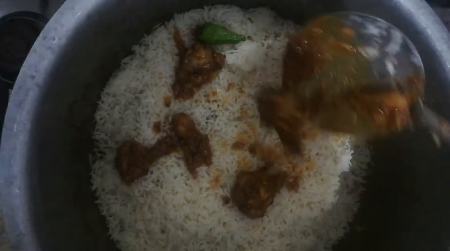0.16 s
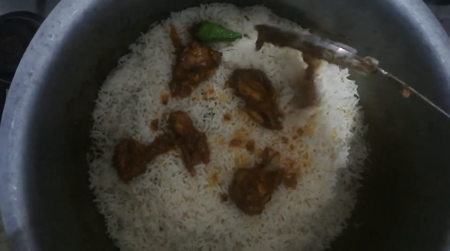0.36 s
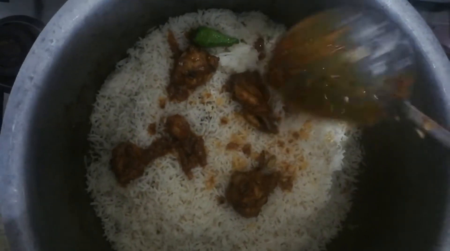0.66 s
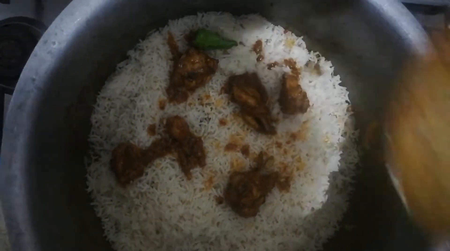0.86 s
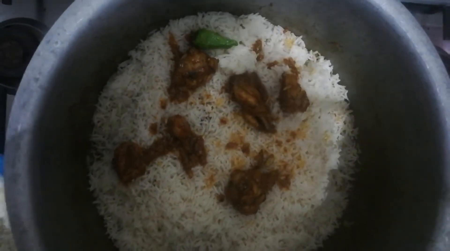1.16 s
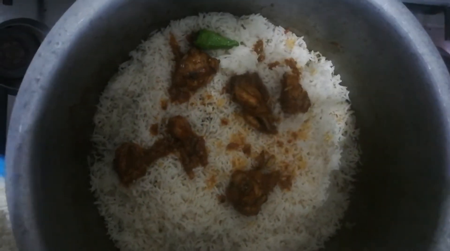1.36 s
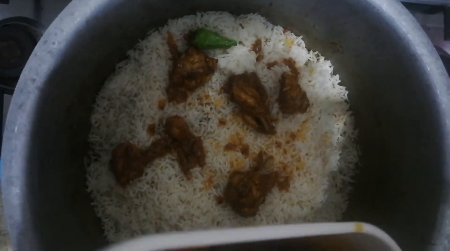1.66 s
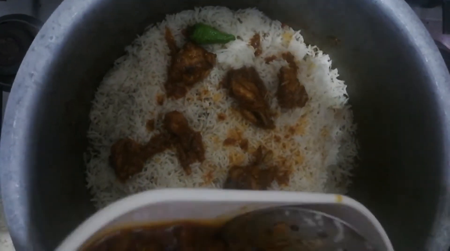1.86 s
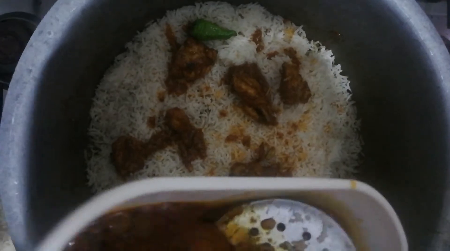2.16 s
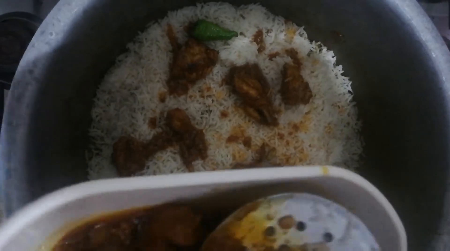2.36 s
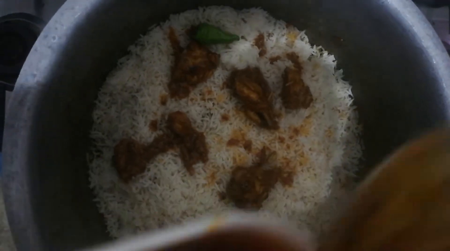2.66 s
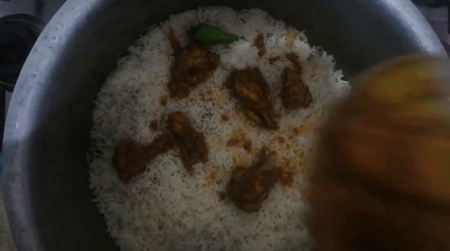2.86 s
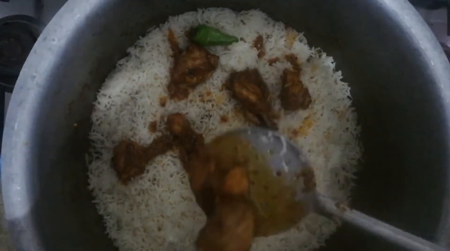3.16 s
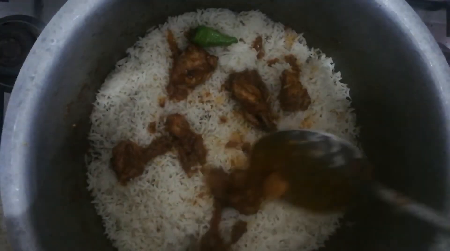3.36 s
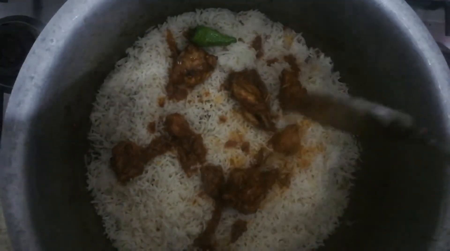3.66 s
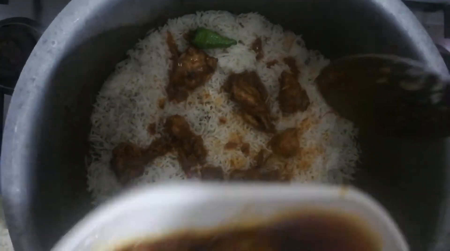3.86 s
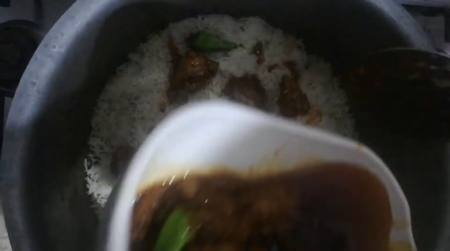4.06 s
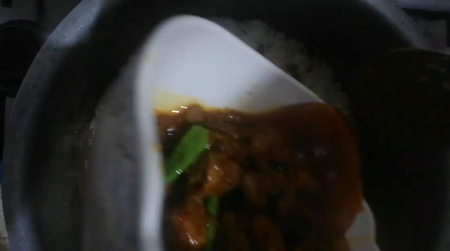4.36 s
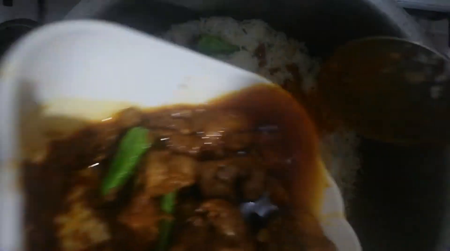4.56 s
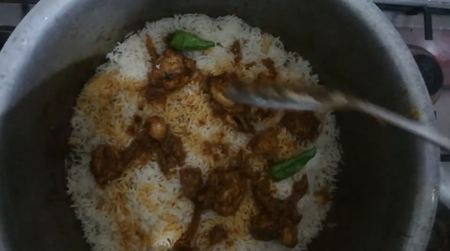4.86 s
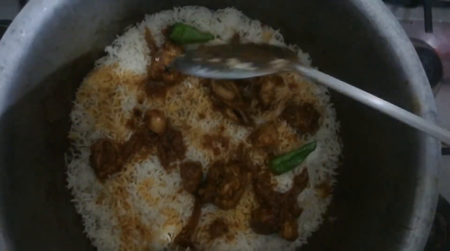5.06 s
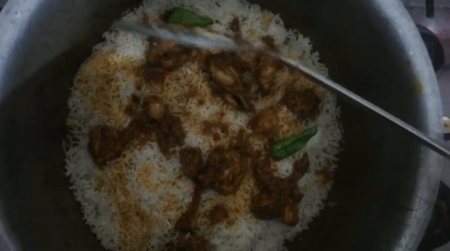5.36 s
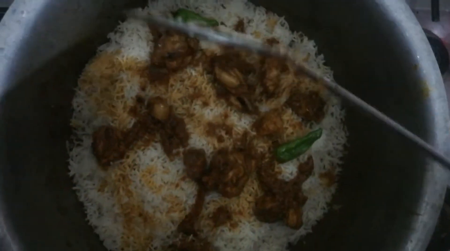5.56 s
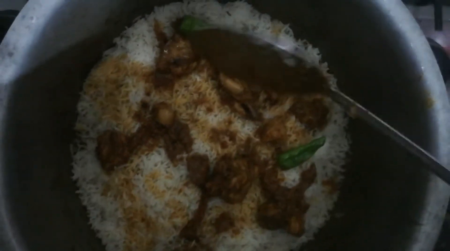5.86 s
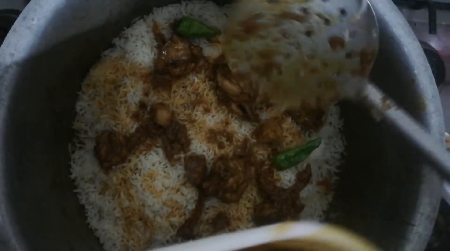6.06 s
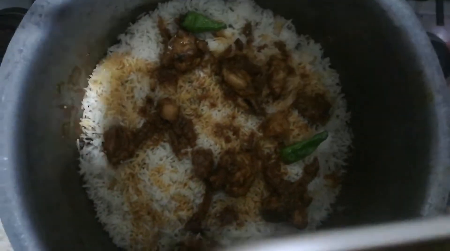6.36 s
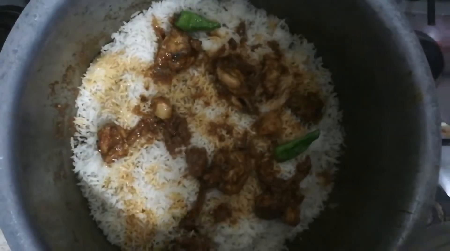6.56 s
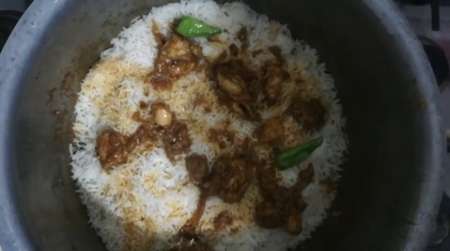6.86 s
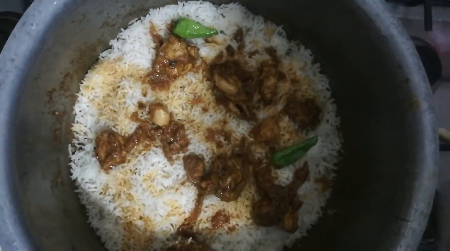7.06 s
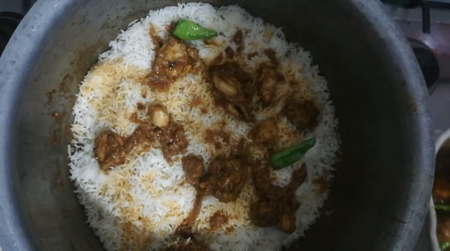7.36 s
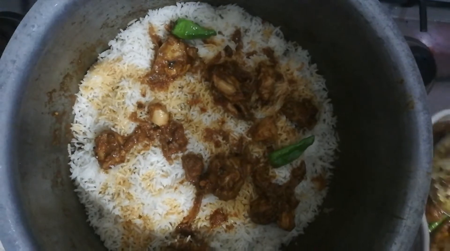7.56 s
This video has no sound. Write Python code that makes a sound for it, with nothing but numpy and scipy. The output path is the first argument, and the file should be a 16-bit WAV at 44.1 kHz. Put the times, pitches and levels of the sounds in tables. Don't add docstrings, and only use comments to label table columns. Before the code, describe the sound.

In a small tiled kitchen, low hum and soft frying hiss continue with tiny fat spits and a muffled bump against the microphone. A steel spoon cracks against a plastic sauce bowl several times, and the bowl thuds on a metal pot that rings. Sauce squelches briefly, later pours with fine bubbling froth, then the sound cuts suddenly to a wavering gas burner rumble over even hiss.

```python
import sys
import numpy as np
from scipy import signal
from scipy.fft import rfft, irfft
from scipy.io import wavfile
from scipy.ndimage import uniform_filter1d

SR = 44100
rng = np.random.default_rng(int(sys.argv[2]) if len(sys.argv) > 2 else 0)


def transcribe(u):
    v = np.clip(np.atleast_2d(u).T, -1, 1)
    q = np.round(v * 32767).astype(np.int16)
    wavfile.write(sys.argv[1], SR, q)


def convert_level_to_amplitude(level_db):
    exponent = np.asarray(level_db, float) / 20
    return 10 ** exponent


N = 340493
T = np.arange(N) / SR


def unit(x):
    return x / np.sqrt(np.mean(x ** 2))


def band(x, lo_hz, hi_hz):
    sos = signal.butter(2, [lo_hz, min(hi_hz, .45 * SR)], "band", fs=SR, output="sos")
    return signal.sosfilt(sos, x)


def add(out, s, x):
    i = int(s * SR)
    out[i:i + len(x)] += x[:N - i]


def walk(rate):
    k = int(SR / rate)
    held = np.repeat(rng.standard_normal(N // k + 1), k)
    return 2.04 * uniform_filter1d(uniform_filter1d(held, k), k)[:N]


def tinted(x, spectrum):
    hz, db = np.transpose(spectrum)
    f = np.fft.rfftfreq(len(x), 1 / SR) + 1
    gain = convert_level_to_amplitude(np.interp(np.log(f), np.log(hz), db, left=-150, right=-150))
    return rfft(x) * gain, f


def coloured(spectrum, flicker_db, grain_db, centres):
    size = convert_level_to_amplitude(grain_db * np.minimum(rng.exponential(size=N), 2.2))
    starts = (rng.random(N) < .001) * size
    puffs = signal.fftconvolve(starts, np.exp(-T[:SR // 50] / 0.0018))[:N]
    source, f = tinted(rng.standard_normal(N) * (1 + 0.5 * puffs), spectrum)
    shares = [np.interp(np.log(f), np.log(centres), row) for row in np.eye(len(centres))[1:-1]]
    return sum(irfft(source * share, N) * convert_level_to_amplitude(flicker_db * walk(8)) for share in shares)


def background(levels, low, middle, top, hum_flicker_db, grain_db):
    hum = coloured(low, hum_flicker_db, 2.1, [10, 20, 60, 120, 240, 450, 700])
    hum *= convert_level_to_amplitude(hum_flicker_db * walk(18))
    hiss = coloured(middle, 0.76, grain_db, [450, 700, 1300, 2400, 4200, 6500, 9000])
    sizzle = coloured(top, 1.0, grain_db, [5560, 9000, 12260, 15100, 18000])
    return sum(unit(x) * convert_level_to_amplitude(db) for x, db in zip((hum, hiss, sizzle), levels))


def kitchen():
    # t/s, hiss level/dB
    frying = [
        (0, -65.5),
        (.3, -62.5),
        (1.0, -61),
        (1.5, -62.5),
        (2.7, -63),
        (3.9, -62),
        (4.89, -65.5),
    ]
    # f/Hz, level/dB
    hum_colour = [(12, -45), (20, 0.5), (38, -13), (70, -2), (178, -6.5), (213, 1), (262, -10), (700, -19)]
    hiss_colour = [(450, -5), (652, -17.5), (1430, -13), (2600, -13.5), (4700, -14.5), (5900, -20),
                   (10000, -15)]
    sizzle_colour = [(6000, -25), (7290, -3), (10500, -2.5), (13200, -8), (14800, -14), (15700, -16),
                     (16200, -29), (16500, -50)]
    swell_s, swell_width_s = 0.63, 0.16
    hum_db = -64.5 + 5 * np.exp(-((T - swell_s) / swell_width_s) ** 2)
    fry_db = np.interp(T, *np.transpose(frying))
    top_db = fry_db - 8 + 3 * np.exp(-(T / 0.99) ** 2)
    return background((hum_db, fry_db, top_db), hum_colour, hiss_colour, sizzle_colour, 0.62, 6.3)


def bubbles(rows, crack_db):
    out, t = np.zeros(N), T[:SR // 20]
    for s, db, hz, cycles, glide in rows:
        life = max(cycles, .5) / hz
        noise = rng.standard_normal(len(t))
        ragged = 1 + 0.62 * unit(uniform_filter1d(noise, size=30))
        envelope = np.exp(-(1.14 * t / life) ** 2) * np.minimum(t / life / 0.066, 1)
        tone = np.sin(2 * np.pi * hz * t * (1 + glide * t / life / 2)) * envelope
        crack = band(noise * np.exp(-t / 0.0016), hz / 1.38, min(hz * 3.3, 14500.))
        add(out, s, convert_level_to_amplitude(db) * (ragged * tone + convert_level_to_amplitude(crack_db) * crack))
    return out


def spits():
    # t/s, peak level/dB, f/Hz
    fat_spits = [(.1915, -47, 1890), (.4464, -43.5, 9000), (.62, -45, 9000), (.6654, -53, 1430),
                 (.674, -50, 2470), (.745, -52, 11000), (.7647, -44.5, 3460), (1.2101, -52, 3480),
                 (1.4232, -49, 2160), (2.4133, -54, 4500), (2.51, -49, 3630), (2.645, -61, 4500),
                 (2.9501, -52, 5000), (3.023, -52, 1440), (3.1872, -54, 2450), (3.338, -48, 1700),
                 (3.4348, -46.5, 1570), (3.5686, -49, 11000), (4.1594, -56, 2430), (5.1625, -53, 1820),
                 (5.255, -53, 2110), (5.5505, -53, 1680), (5.6497, -52.5, 1670), (6.555, -57, 1040),
                 (7.188, -53.5, 1460), (7.3594, -63, 3280)]
    least_cycles, extra_life_s = 2.5, 0.00049
    return bubbles([(s, db, hz, least_cycles + hz * extra_life_s, 0) for s, db, hz in fat_spits], -0.3)


def bumps():
    # t/s, peak level/dB, f/Hz, length/cycles
    pushes = [
        (0.205, -32, 78.3, 1.07),
        (1.223, -42, 63.4, 0.94),
        (1.244, -48, 55, 1.4),
        (1.273, -48, 61, 2.4),
        (1.4740, -44.5, 69.5, 1.2),
    ]
    out, t = np.zeros(N), T[:SR // 5]
    for s, db, hz, cycles in pushes:
        swell = np.sin(np.pi * np.minimum(t * hz / cycles, 1))
        add(out, s, convert_level_to_amplitude(db) * np.sin(2 * np.pi * hz * t) * swell)
    return out


def ring(modes, longest, split_hz):
    t = T[:SR // 2 + SR // 4]
    hz, db, t60 = np.transpose(modes)[:, :, None]
    phase, offset, detune = rng.random((3,) + hz.shape)
    main = np.sin(2 * np.pi * (hz * t + phase))
    twin = 0.53 * np.sin(2 * np.pi * ((hz + split_hz * (detune - .5)) * t + phase + offset / 2))
    twin += 0.39 * np.sin(2 * np.pi * ((hz - split_hz * offset) * t + detune)) * (hz < 1200)
    decay = convert_level_to_amplitude(db - 60 * t / np.clip(t60, .004, longest))
    return (decay * (main + twin)).sum(0)


def knocks():
    # t/s, peak level/dB, time until damped/ms, rattle level/dB, metal ring level/dB
    blows = [
        (1.5518, -11.5, 11, -5.5, -35.5),
        (1.7545, -6, 4.7, -9, -37.5),
        (2.0783, -12.5, 11, -0.5, -32.5),
        (2.0934, -25, 7.2, 8, -45),
        (2.1607, -11.5, 18, -4.5, -27),
        (2.3524, -22.5, 15, -3.5, -29),
    ]
    # f/Hz, level/dB, t60/s
    rim_a = [(589, -1.5, 0.12), (1259, 3.5, 0.11), (2308, 1, 0.085), (2570, -1, 0.048), (3090, -6.5, 0.088),
             (4840, -5, 0.12), (5350, -12, 0.2), (7200, -13, 0.13), (7960, -4.5, 0.017), (8200, -12, 0.047),
             (8600, -28, 0.04), (10560, 3, 0.026), (11000, -11, 0.055), (12700, -23, 0.024)]
    rim_b = [(588, -6, 0.11), (896, -7.5, 0.068), (1238, -7, 0.091), (1890, -5.5, 0.042),
             (2270, -18, 0.047), (2450, -12, .02), (3280, -22, 0.095), (3910, -6, 0.025), (4640, -8, 0.042),
             (7570, 2, 0.013), (9400, -11, 0.027), (9668, -42, 0.016), (10800, -8.5, 0.012),
             (12000, -9, 0.017)]
    wall = [(560, -5.5, 0.13), (1170, -22, 0.034), (2580, -20, 0.15), (3200, -8, 0.012), (3400, -4, 0.026),
            (3810, -7, 0.019), (4260, 4.5, 0.012), (4877, -15, 0.019), (6530, 1, 0.0083),
            (10100, -27, 0.034)]
    pot_thud = [(216, -3, 0.027), (340, 0.5, 0.051), (435, -5, .05), (587, 4.5, 0.033), (767, 1, 0.024),
                (997, -5, 0.06), (1133, -8, .08), (1610, -16.5, 0.056), (2290, -19, .1), (3170, -14, 0.057),
                (3330, -34, 0.034), (4310, -11, 0.055), (5000, -13, .07), (5860, -21, 0.01)]
    tap = [(840, 3.5, 0.026), (1000, -0.5, 0.064), (1700, 1, 0.011), (2040, 3, 0.01), (2600, -5, 0.02),
           (3350, -26, 0.027), (4500, 1.5, .012), (6400, -16, 0.013), (7870, -11, .012)]
    # f/Hz, level/dB, t60/s
    spoon = [(542, -3.5, 0.9), (1290, -10, 0.17), (1836, -24, .5), (2090, -21, .6), (2207, -24, 0.22),
             (2500, -22, .6), (3705, -18, 0.17), (4580, -10, 0.13), (4930, -8, .7), (6300, -24, .4),
             (7790, -25, .7)]
    spoon_dipped = [(339, -13, 0.92), (553, -3, 1), (944, -15, 0.95), (1130, -22, 0.45), (1227, -28, 0.4),
                    (1990, -11, 0.54), (2140, -3.5, 0.43), (2950, -2, 0.46), (3680, -14, 0.67),
                    (5690, -32, .25), (7900, -14, 0.51)]
    pot_rings = [(123.3, 0.5, 1), (165, -22, 1), (200.3, 0.5, 1), (236.6, 4, 0.61), (279, -4, 0.45),
                 (336.5, -4.5, 0.55), (423, -5, 0.56), (578, -7, 1), (793, -12, 0.56),
                 (890, -7, 1.0), (997, -17, 0.98), (1099, -12, 1), (1152, -8, 0.84), (1620, -7.5, 0.79),
                (1670, -7, 0.5), (1736, -7.5, 0.78), (2250, -8, .3), (2320, -7, 0.62), (3488, -12, 0.31),
                (4650, -19, 0.48)]
    # f/Hz, level/dB
    rattle_colours = [
        [(150, -48), (250, -20), (1260, -13), (1610, -8), (2200, -4), (3460, -17), (10900, -23), (16000, -44)],
        [(150, -50), (250, -20), (484, -28), (1910, -4.5), (4650, -21.5), (5730, -22), (11100, -21),
         (16000, -39)],
        [(150, -53), (250, -21), (566, 0), (845, -19), (1200, 6.5), (2810, -30), (10400, -27), (16000, -58)],
        [(150, -47), (250, -17), (1200, 0.5), (2710, -14.5), (4190, -14.5), (9490, -39), (16000, -54)],
        [(59, -20), (100, 10.5), (1080, -11.5), (2000, -10.5), (4200, -17), (9210, -30.5), (12400, -41),
         (16000, -78)],
        [(240, -40), (400, -7), (1010, 7), (4440, -16), (7990, -35), (14100, -48), (16000, -71)],
    ]
    bodies = [rim_a, rim_b, wall, wall, pot_thud, tap]
    pot = pot_rings
    metals = [spoon, spoon_dipped, spoon_dipped, spoon_dipped, pot, pot]
    room_dbs = [-10.5, -10.5, -13, -13, -8, -14.5]
    dry, wet = np.zeros(N), np.zeros(N)
    for blow, body, metal, colour, room_db in zip(blows, bodies, metals, rattle_colours, room_dbs):
        s, db, damp_ms, rattle_db, ring_db = blow
        modes = ring(body, 0.15, 60.)
        t = T[:len(modes)]
        swell = convert_level_to_amplitude(db) * (1 - np.exp(-t / 0.00065))
        damping = 0.39 + 0.55 * np.exp(-(t * 1000 / damp_ms) ** 3)
        modes *= swell * damping / np.abs(modes).max()
        noise = unit(irfft(tinted(rng.standard_normal(len(t)), colour)[0], len(t)))
        crack = convert_level_to_amplitude(9.5) * band(noise, 2600.0, 21000.0) * convert_level_to_amplitude(-60 * t / 0.013)
        rattle = noise * convert_level_to_amplitude(-60 * t / 0.038) + crack
        rattle *= swell * damping * convert_level_to_amplitude(rattle_db) / 2
        add(dry, s, modes + rattle + swell * convert_level_to_amplitude(ring_db) * ring(metal, 1.2, 30.0))
        impulse = irfft(tinted(t == 0, colour)[0], len(t))
        click = unit(np.roll(impulse, SR // 400) * (t < .05))
        click = (click + convert_level_to_amplitude(5) * band(click, 2700.0, 21000.0)) * convert_level_to_amplitude(db + rattle_db - 31)
        add(wet, s, convert_level_to_amplitude(room_db) * (convert_level_to_amplitude(-6.5) * modes + convert_level_to_amplitude(-4.5) * rattle + click))
    return band(dry, 133.0, 24000.0), band(wet, 67.0, 12000.0)


def room(x):
    # f/Hz, t60/s
    decays = [(100, 1), (250, 1), (600, 1), (1500, 1), (3500, 0.59), (7000, 0.66), (13000, 0.45)]
    wall_return = [4, 2.5, 5, 3.5, 0.5, -1.5, 0]
    t = T[:SR]
    tail = np.zeros(SR)
    for (f, t60), db in zip(decays, wall_return):
        noise = unit(band(rng.standard_normal(SR), f / 1.5, f * 1.5)) * np.sqrt(f)
        tail += noise * convert_level_to_amplitude(db - 60 * t / t60)
    tail *= np.clip((t - .004) / 0.0007, 0, 1)
    return signal.fftconvolve(x, tail / np.sqrt(np.sum(tail ** 2)))[:N]


def whistle():
    middle_s, half_s, peak_hz, sag_hz, peak_db = 2.266, .066, 12350, 1500, -73
    arch = np.minimum(((T - middle_s) / half_s) ** 2, 4)
    gain = convert_level_to_amplitude(peak_db - 20 * arch ** 2) * (T > middle_s - half_s / 2)
    return gain * np.sin(2 * np.pi * np.cumsum(peak_hz - sag_hz * arch) / SR)


def squelch():
    # t/s, peak level/dB, f/Hz, length/cycles, upward glide/share
    bursts = [(2.6630, -47, 11450, 34, .02), (2.6672, -48.5, 3760, 19, .01), (2.6803, -31, 3240, 5.1, 0.25),
              (2.6833, -33, 960, 1.3, 0.43), (2.6845, -34.5, 1448, 9.3, 0.055),
              (2.6850, -29, 2560, 4.2, .05), (2.6890, -31.5, 2110, 10, 0.8), (2.6915, -36, 3680, 19, 0.47),
              (2.6967, -30, 4440, 12, .1), (2.6970, -39.5, 9800, 37, 0.062), (2.7100, -42, 9500, 20, 0.02),
              (2.7110, -38.5, 3140, 8.6, 0.09), (2.7210, -49, 5460, 12, .3), (2.7475, -48, 13830, 40, .02),
              (2.7745, -44.5, 5020, 29, .02), (2.7860, -56.5, 8600, 20, 0.027)]
    return bubbles(bursts, -0.84)


def froth(bursts):
    # f/Hz, level/dB
    froth_colour = [(800, -17), (1590, -24), (1920, -0.5), (3930, -12.5), (4630, -1), (5380, -9), (8440, 0),
                    (16000, -9)]
    flow_from_s, flow_rise_s, flow_db = 4.53, 0.044, -71
    below_peak_db, spread_s = -23, 0.0072
    gain = convert_level_to_amplitude(flow_db) * np.clip((T - flow_from_s) / flow_rise_s, 0, 1)
    for s, db, *_ in bursts:
        gain += convert_level_to_amplitude(db + below_peak_db) * np.exp(-np.abs(T - s) / spread_s)
    return gain * unit(coloured(froth_colour, 2.5, 5.5, [700, 1400, 2600, 4200, 7000, 11000, 16000]))


def pour():
    # t/s, peak level/dB, f/Hz, length/cycles, upward glide/share
    bursts = [(4.5552, -52, 1400, 2.7, 0.084), (4.59, -49, 2790, 8.4, .15), (4.6130, -55, 10300, 15, 0.046),
              (4.6317, -49.5, 3110, 24, 0.046), (4.6360, -52, 7200, 19, .05),
              (4.6567, -50.5, 5350, 12, 0.16), (4.681, -55, 3300, 6.4, .15), (4.6934, -51, 5760, 20, 0.045),
              (4.6979, -46, 3350, 17, 0.17), (4.699, -63, 1940, 49, .01), (4.7227, -48, 5500, 14, 0.35),
              (4.7230, -57, 11500, 18, .2), (4.7336, -43, 5230, 38, 0.11), (4.74, -34, 9600, 24, 0.045),
              (4.75, -44, 9000, 28, .02), (4.774, -49, 3800, 24, 0.072), (4.7797, -53, 3740, 17, .15),
              (4.7957, -46.5, 5360, 23, 0.38), (4.8084, -47, 9650, 35, .1), (4.8453, -52.5, 2510, 29, 0.41),
              (4.8565, -63, 4200, 9.2, 0.19), (4.8690, -52.5, 9200, 33, 0.056), (4.878, -60, 2660, 20, .02)]
    return bubbles(bursts, -4) + froth(bursts)


def burner():
    # t/s, rumble level/dB
    flame = [
        (4.9, -51.5),
        (5.2, -53),
        (5.87, -50),
        (5.91, -53.5),
        (5.98, -50),
        (6.53, -56.5),
        (6.57, -50.5),
        (6.71, -57),
        (7.72, -53),
    ]
    # f/Hz, level/dB
    rumble_colour = [(12, -31), (20, -10), (69, -8), (111, -2), (151, -9), (212, -3.5), (332, -16.5),
                     (700, -31.5)]
    hiss_colour = [(450, -15), (652, -29), (1280, -26), (2060, -25.5), (2890, -31.5), (10800, -35),
                   (15200, -49.5), (16500, -70)]
    hiss_db, top_db = -65, -71.5
    levels = np.interp(T, *np.transpose(flame)), hiss_db, top_db
    return background(levels, rumble_colour, hiss_colour, hiss_colour, 0.53, 4.2)


def scene():
    in_kitchen = T < 4.888
    dry, wet = knocks()
    sauce, poured, fat = squelch(), pour(), spits()
    echo = room(wet + convert_level_to_amplitude(-12.0) * sauce + convert_level_to_amplitude(-8.0) * poured + convert_level_to_amplitude(-7.0) * fat)
    wet_sounds = band(sauce + fat + np.where(in_kitchen, poured, 0), 720.0, 14200.0)
    surroundings = np.where(in_kitchen, kitchen() + echo, burner())
    return (dry + wet_sounds + whistle() + bumps() + surroundings)[None]


def band_limit(x):
    return signal.sosfilt(signal.butter(12, 16810, fs=SR, output="sos"), x)


def record(dry):
    return band_limit(dry)


dry = scene()
out = record(dry)
transcribe(out)
```